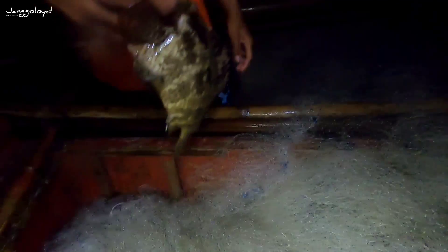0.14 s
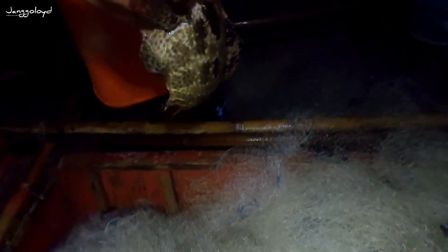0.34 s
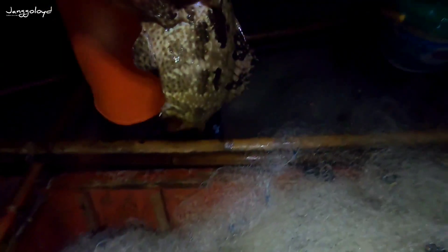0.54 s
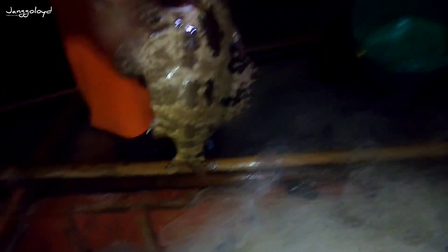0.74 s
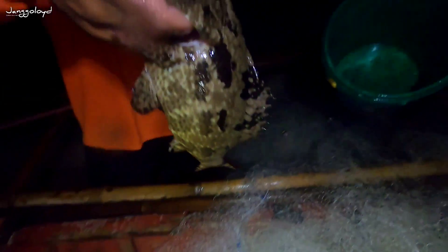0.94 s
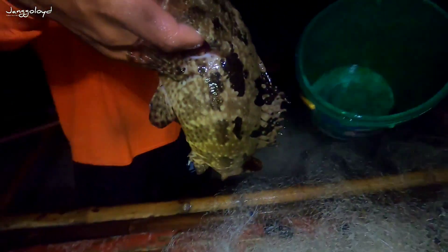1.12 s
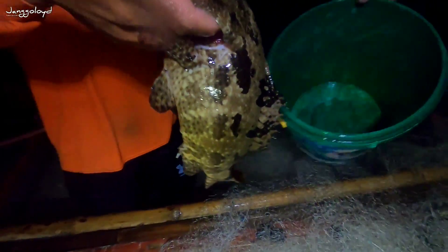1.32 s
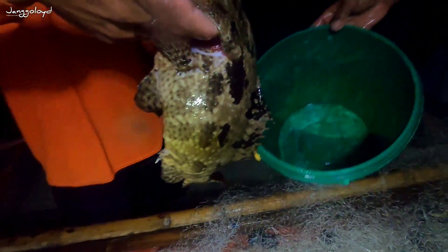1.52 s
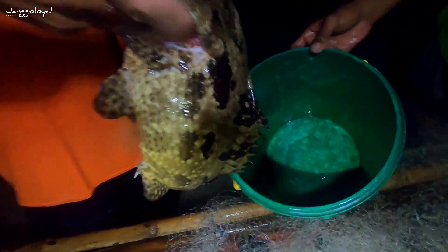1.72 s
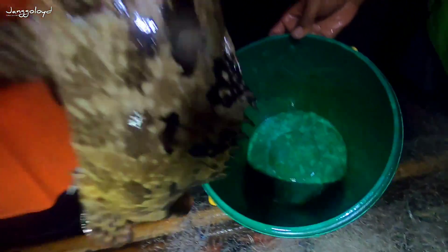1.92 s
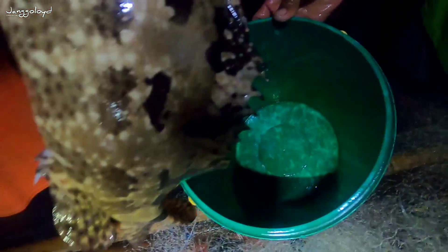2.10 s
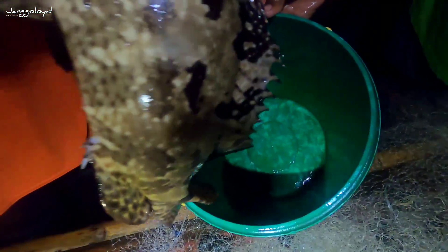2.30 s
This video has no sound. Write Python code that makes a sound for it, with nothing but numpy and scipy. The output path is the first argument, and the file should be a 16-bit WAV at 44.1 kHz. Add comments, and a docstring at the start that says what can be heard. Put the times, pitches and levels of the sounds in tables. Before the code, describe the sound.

Very close, dry knocks and bassy jolts crowd together, loudest just before one second, over gritty rubbing; they stop abruptly, leaving quiet open air, faint water blips, low rumble and one dull plastic bump.

```python
"""Rubbing and a low rumble are heard first; knocks, jolts, clinks and a squeak fill the first second.
They come from a hand-held case with two microphones, shifted in the grip on a small boat.
Then a low rumble and faint hiss remain, with faint water laps and a soft hollow bump from a bucket.
Struck bodies are sums of decaying modes; rubbing is random clicks; rumble and hiss are filtered noise."""
import sys
import numpy as np
from scipy import signal
from scipy.fft import rfft, irfft
from scipy.io import wavfile
from scipy.ndimage import uniform_filter1d

SR = 44100
rng = np.random.default_rng(int(sys.argv[2]) if len(sys.argv) > 2 else 0)


def master_out(mix):
    """Clip the mix to full scale and print it as 16-bit PCM to the path in sys.argv[1]."""
    frames = np.transpose(np.atleast_2d(mix))
    ceiling = np.clip(frames, -1, 1)
    pcm = np.round(ceiling * 32767).astype(np.int16)
    wavfile.write(sys.argv[1], SR, pcm)


N = 103635

# rubbing level over time: time_s, level_db (before flicker)
RUB_LEVEL = [(0, -52.5), (.176, -59), (.186, -38), (.21, -39.5), (.265, -47.5), (.295, -49), (.316, -37.5),
             (.335, -45.5), (.368, -37.5), (.412, -55), (.427, -39.5), (.45, -55.5), (.535, -43),
             (.572, -48), (.6, -40), (.655, -41), (.69, -60), (.745, -50.5), (.82, -59.5), (.85, -35),
             (.895, -39.5), (.918, -57.5), (.98, -90.5)]
# spectrum of the rubbing: frequency_hz, relative_db
RUB_SPECTRUM = [(150, 5.5), (300, -9), (580, -0.5), (800, -0.5), (1200, 6.5), (1900, 3), (2400, -3.5),
                (3000, 1), (3700, -11), (4500, -9), (5600, -17), (8000, -36.5), (11000, -51),
                (16000, -51.5)]
RUB_GRAINS_PER_S, GRAIN_SPREAD_DB = 2400, 4
RUB_FLICKER_DB, RUB_FLICKER_PER_S = 2, 150  # how fast the grip catches and lets go
RUB_FLUTTER_DB, RUB_FLUTTER_PER_S = 3.5, 90
# fine crackles as the wet grip slides: middle_s, half_width_s, level_db, left_minus_right_db
CRACKLE_SWELLS = [(0.615, 0.02, -43.5, 10), (0.853, 0.0041, -45.5, 4), (.881, .012, -40, 4)]
# spectrum of the crackles: frequency_hz, relative_db
CRACKLE_SPECTRUM = [(1000, -14.5), (3200, 15), (4800, 0.5), (6500, -11), (9500, -7.5), (12000, -19),
                    (16000, -34.5)]
CRACKLE_PER_S = 1800

# low rumble over time: time_s, level_db
RUMBLE_LEVEL = [(0, -36.5), (.2, -39.5), (.45, -33.5), (.65, -24), (.85, -25.5), (.97, -46), (1.1, -47),
                (1.28, -51.5), (1.45, -49), (1.75, -45), (1.97, -44), (2.09, -39), (2.2, -39.5),
                (2.35, -40)]
# spectrum of the rumble: frequency_hz, relative_db
RUMBLE_SPECTRUM = [(3, -35), (12, -7.5), (25, 2), (38, 3), (60, -13.5), (85, -18), (120, -15.5), (170, -28),
                   (250, -43), (400, -58.5), (900, -88)]
RUMBLE_SIDE_DB = -35  # level of the unshared part
# faint hiss over time: time_s, level_db (before the overall hiss level)
HISS_LEVEL = [(0.95, -63), (1.31, -75), (1.5, -63.5), (1.8, -63), (1.95, -62), (2.298, -62), (2.33, -63.5)]
# spectrum of the hiss: frequency_hz, relative_db
HISS_SPECTRUM = [(200, -12), (400, -10), (600, -8.5), (800, -17), (1000, -1), (1190, 7.5), (1500, -6.5),
                 (2000, -10), (2600, -11), (3050, -8.5), (3700, -17.5), (5000, -21.5), (7000, -34.5),
                 (10000, -49.5), (16000, -38)]
HISS_SIDE_DB, HISS_DB, HISS_FLICKER_DB = -29.5, -2, 1.5  # stereo width, overall level, waver
HISS_FLUTTER_DB, HISS_FLUTTER_PER_S = 1.7, 22
FLUTTER_LOW_HZ = 350

# knocks on the case: start_s, six levels_db (one per band below), left_minus_right_db (at PAN_FULL_HZ),
# ring_length_factor, pitch_factor (from the grip)
KNOCK_EVENTS = [(.186, -68, -66, -37, -53, -47, -90, -5, 3.5, 1.01),
                (0.2322, -42, -38, -26, -20, -39.5, -61, 0, 1.2, .88),
                (0.3023, -40.5, -29.5, -36, -44.5, -72, -86, -6, 0.74, 0.97),
                (0.3137, -72, -39, -40, -66, -78, -88, -15, 4, 0.74),
                (.341, -67, -40, -42, -43, -55, -79, 6, 1.9, 0.93),
                (0.3598, -53, -69, -30.5, -37, -32, -60, -0.5, 1.07, 1.097),
                (0.419, -69, -48, -51, -62, -55, -74, -3, 3.34, 0.97),
                (0.5112, -78.5, -42, -46, -42.5, -47, -78, 0, 1.4, 0.97),
                (0.5338, -60, -61, -38.5, -39.5, -43.5, -76, 2, 1.8, 0.78),
                (0.5877, -34.5, -42, -32.5, -36.5, -51.5, -69, 1, 1.3, 1.01),
                (.5902, -50, -40, -27.5, -31.5, -44.5, -62, 3, 1.2, 0.97),
                (.618, -53.5, -56.5, -52, -29.5, -39, -52, 2.5, 0.48, 1.07),
                (0.661, -40.5, -41, -52, -46, -50, -67.5, -0.5, 1.6, 0.97),
                (0.672, -24, -21.5, -31, -12, -24.5, -42.5, 7.5, 0.58, 1.038),
                (0.7164, -70, -71, -63, -54.5, -54, -77, 3.5, 0.73, 1.04),
                (0.7506, -15.5, -27, -16.5, -25, -26, -47, -2, .6, 1.096),
                (.793, -39, -57, -49, -61, -50.5, -71, 1, 1.7, 0.97),
                (0.8573, -13, -15.5, -32, -25.5, -34, -76.5, -1.5, 0.71, 1.04),
                (0.8693, -30.5, -39.5, -29.5, -23, -33.5, -47, 4.5, 0.95, 0.996),
                (0.8887, -51, -33.5, -26.5, -27, -47.5, -66.5, 7.5, 1.1, .92),
                (.9012, -45.5, -29, -33.5, -44, -55, -81, -2, 1.2, 1.24)]
# centres of the knock bands: frequency_hz
KNOCK_CENTRES_HZ = [330, 620, 1600, 3000, 4600, 8000]
# modes of the case, before each knock's pitch factor: pitch_hz
CASE_PITCHES_HZ = [275, 410, 580, 740, 1170, 1300, 1600, 1890, 2120, 2900, 3220, 3700, 4500, 6400, 8700]
# strength and ring of those modes, before each knock's length factor: relative_db, t60_s
CASE_MODES = [(-1.5, .02), (2.5, 0.016), (1.5, .03), (-5.5, 0.0069), (-2.5, 0.029), (-3, 0.019),
              (-6.5, 0.027), (-2, 0.012), (-8, 0.013), (-5.5, 0.017), (0, 0.0034), (-5, 0.004),
              (-7.5, 0.0056), (-8.5, 0.0066), (-8, 0.0069)]
CASE_DETUNE = .012  # random spread of mode pitch, as a fraction
CONTACT_CYCLES = 0.54  # a mode swells over this part of its nominal period
PORT_TURN_RAD, PORT_SCATTER_RAD = 1.414, 0.28  # the two microphones ride the modes out of step
PAN_FULL_HZ = 3240  # lower modes reach both microphones more evenly
CRACK_DB, CRACK_T60_S, CRACK_TOP_DB = -19, 0.012, -21.5  # t60 before the length factor
# one knock leaves the case ringing hollow
HOLLOW_S, HOLLOW_HZ, HOLLOW_DB, HOLLOW_T60_S = .5885, 578, -5, 0.037

# jolts: start_s, pitch_hz, level_db, t60_s, phase_between_microphones_rad
JOLTS = [(0.2358, 36.2, -6, 0.15, 0.17), (0.237, 104, -17.5, 0.1, 0.11), (0.303, 72.5, -11, 0.036, 0.45),
         (0.435, 54, -30.5, 0.27, 0.41), (0.511, 30.8, -24, 0.82, 0.23), (0.588, 113, -8, 0.042, 0.15),
         (0.594, 32.4, -5.5, 0.18, 0.38), (0.673, 112.2, -2.5, .035, 2.7),
         (0.752, 60.7, -13.5, 0.037, 0.59), (0.753, 165, -14, 0.034, 0.5), (0.821, 25.4, -11.5, 0.15, 0.13),
         (0.8587, 128.5, -0.5, 0.027, 0.81), (0.868, 179.6, -8, 0.061, 0.26),
         (0.873, 44.75, -6.5, 0.15, 0.19), (0.9, 110.4, -13, .11, 0.054)]
THUMP_ATTACK_S = 0.0024

# clinks of a small hard part: start_s, level_db
CLINK_EVENTS = [(.552, -20.5), (.8885, -29)]
# modes of that part: pitch_hz, relative_db, t60_s
CLINK_MODES = [(1720, -7, .042), (2112, 0, .046), (2590, -10, .045), (4635, -3, .011)]

# the grip squeaks until a knock lands at 0.672 s
SQUEAK_S, SQUEAK_LENGTH_S = .645, .027
SQUEAK_HZ, SQUEAK_WAVER = 2790, .006  # waver as a fraction of the pitch
SQUEAK_DB, SQUEAK_PAN_DB = -30.5, -13.5

# water laps and drips beside the boat: start_s, pitch_hz (centre), level_db (first bubble)
LAP_EVENTS = [(1.015, 970, -50.5), (1.059, 1195, -52.5), (1.39, 1070, -51.5), (1.432, 545, -59.5),
              (1.508, 1181, -46), (1.525, 630, -59), (1.554, 1194, -48.5), (1.622, 1196, -50),
              (1.726, 2943, -59), (1.775, 659, -53), (1.778, 3053, -58.5), (1.89, 988, -46.5),
              (2.135, 2450, -56.5), (2.274, 1120, -55)]
LAP_SPREAD = .03  # random spread of bubble pitch, in natural-log units
LAP_T60_S, LAP_SCATTER_S = 0.033, .016

# modes of the bucket: pitch_hz, relative_db, t60_s
BUCKET_MODES = [(68, 8.5, 0.123), (127.3, 10.5, 0.067), (183.4, 7, 0.13), (256.5, 11.5, 0.072),
                (325, 2, 0.03), (554, -6, 0.031), (941, -11.5, 0.076), (1177, 3, 0.039), (2400, -16, 0.055),
                (3030, -17, 0.051)]
# blows of its bump: start_s, level_db
BUCKET_BLOWS = [(1.82, -37.5), (1.849, -47.5), (1.891, -57)]

TOP_HZ = 16200
CEILING = 1.05  # full scale is 1


def undb(db):
    """Logarithmic level: 20 dB is a tenfold amplitude."""
    return 10 ** (np.asarray(db) / 20)


def curve(rows):
    """Envelope: level is interpolated in dB between (time_s, level_db) points, giving a gain."""
    return undb(np.interp(np.arange(N) / SR, *np.array(rows).T))


def pan(db):
    """Intensity stereo: half the level difference goes to each side with opposite sign."""
    return undb(np.array([[db], [-db]]) / 2)


def colour(x, rows):
    """Linear filtering: the spectrum is weighted by (frequency_hz, db) points, then scaled to rms 1."""
    hz, db = np.array(rows).T
    f = np.fft.rfftfreq(x.shape[-1], 1 / SR)
    gain = undb(np.interp(np.log(f + 1), np.log(hz), db))
    y = irfft(rfft(x) * gain, x.shape[-1])
    return y / np.sqrt(np.mean(y ** 2))


def walk(rate):
    """Slow random fluctuation: noise averaged twice over 1/rate seconds, with standard deviation 1."""
    k = int(SR / rate)
    y = uniform_filter1d(uniform_filter1d(rng.standard_normal(N), k), k)
    return y / y.std()


def add(out, start, sound):
    """Superposition: a sound is summed in at its start time."""
    i = int(start * SR)
    out[:, i:i + sound.shape[1]] += sound[:, :N - i]


def fade(t, t60):
    """Exponential damping: amplitude falls by 60 dB in t60 seconds."""
    return np.exp(-np.log(1000) * t / t60)


def ring(hz, t60, attack, turn):
    """Damped resonance: one mode swells and decays, turn radians apart at the two microphones."""
    t = np.arange(SR // 3) / SR
    phase = np.array([[turn], [-turn]]) / 2
    swell = (1 - np.exp(-(t / attack) ** 2)) ** 2
    return np.sin(2 * np.pi * hz * t + phase) * fade(t, t60) * swell


def stereo_noise(rows, side_db):
    """Partial coherence: a shared noise plus a second one in opposite sign on the two sides."""
    mid, side = colour(rng.standard_normal((2, N)), rows)
    return mid + undb(side_db) * side * np.array([[1], [-1]])


def flutter(x, db, per_s, count=14):
    """Band-wise modulation: third-octave slots waver independently, each gain having mean power 1."""
    f = np.fft.rfftfreq(N, 1 / SR)
    # the end slots take all that lies below and above
    place = np.clip(np.log2(f / FLUTTER_LOW_HZ + 1e-9) * 3, 0, count - 1)
    spectrum, out = rfft(x), 0
    for k in range(count):
        gain = undb(db * walk(per_s))
        slot = irfft(spectrum * np.maximum(1 - abs(place - k), 0), N)
        out = out + slot * gain / np.sqrt(np.mean(gain ** 2))
    return out


def slips(per_s):
    """Stick-slip friction: random clicks of uneven size and either sign, independent on each side."""
    sizes = undb(GRAIN_SPREAD_DB * np.minimum(rng.exponential(size=(2, N)), 3))
    signs = rng.choice([-1, 1], (2, N))
    return sizes * signs * (rng.random((2, N)) < per_s / SR)


def rubbing():
    """Dry friction: skin sticks and slips on the case in dense clicks, with brighter crackles."""
    flicker = undb(RUB_FLICKER_DB * walk(RUB_FLICKER_PER_S))
    rub = colour(slips(RUB_GRAINS_PER_S), RUB_SPECTRUM) * curve(RUB_LEVEL) * flicker
    t = np.arange(N) / SR
    swells = 0
    for middle, width, db, pan_db in CRACKLE_SWELLS:
        swells = swells + np.exp(-((t - middle) / width) ** 2) * undb(db) * pan(pan_db)
    crackle = colour(slips(CRACKLE_PER_S), CRACKLE_SPECTRUM) * swells
    return flutter(rub, RUB_FLUTTER_DB, RUB_FLUTTER_PER_S) + crackle


def background():
    """Broadband noise: filtering and slow envelopes shape a low rumble and a faint wavering hiss."""
    rumble = stereo_noise(RUMBLE_SPECTRUM, RUMBLE_SIDE_DB) * curve(RUMBLE_LEVEL)
    waver = undb(HISS_DB + HISS_FLICKER_DB * walk(23))
    hiss = stereo_noise(HISS_SPECTRUM, HISS_SIDE_DB) * curve(HISS_LEVEL) * waver
    return rumble + flutter(hiss, HISS_FLUTTER_DB, HISS_FLUTTER_PER_S)


def case_ring(band_db, pan_db, length, pitch):
    """Modal excitation: a knock drives every mode of the case, weighted by its band levels."""
    hit = 0
    chances = rng.standard_normal((len(CASE_MODES), 2))
    for k, (hz, (db, t60), (detune, turn)) in enumerate(zip(CASE_PITCHES_HZ, CASE_MODES, chances)):
        mode_db = db + np.interp(np.log(hz), np.log(KNOCK_CENTRES_HZ), band_db)
        decay = t60 * length
        # longer rings start weaker, which offsets their longer decay; signs alternate
        size = (-1) ** k * undb(mode_db) * np.sqrt(0.18 / decay) * pan(pan_db * hz / PAN_FULL_HZ)
        apart = PORT_TURN_RAD * min(hz / 900, 1) + PORT_SCATTER_RAD * turn
        mode_hz = hz * pitch * (1 + CASE_DETUNE * detune)
        hit = hit + size * ring(mode_hz, decay, CONTACT_CYCLES / hz, apart)
    return hit


def contact_crack(band_db, pan_db, length):
    """Impact noise: a short decaying burst carries the knock's own spectrum, after 1/20 s of lead-in."""
    t = np.arange(SR // 8) / SR
    per_hz = np.array(band_db) - 10 * np.log10(KNOCK_CENTRES_HZ)  # band level to density
    shape = [*zip(KNOCK_CENTRES_HZ, per_hz), (TOP_HZ, per_hz[-1] + CRACK_TOP_DB)]
    burst = rng.standard_normal((2, len(t))) * fade(t, CRACK_T60_S * length)
    crack = colour(np.pad(burst, ((0, 0), (SR // 20, 0))), shape)
    return undb(CRACK_DB) * np.linalg.norm(undb(band_db)) * crack * pan(pan_db)


def knocks():
    """Impact on a shell: each knock sums ringing modes and a crack; one adds a hollow resonance."""
    out = np.zeros((2, N))
    for start, *band_db, pan_db, length, pitch in KNOCK_EVENTS:
        add(out, start, case_ring(band_db, pan_db, length, pitch))
        add(out, start - 1 / 20, contact_crack(band_db, pan_db, length))
    hollow = ring(HOLLOW_HZ, HOLLOW_T60_S, attack=0.0042, turn=0.55)
    add(out, HOLLOW_S, undb(HOLLOW_DB) * hollow)
    return out


def thumps():
    """Damped low-frequency motion: each jolt sways the microphones in a decaying oscillation."""
    out = np.zeros((2, N))
    for start, hz, db, t60, turn in JOLTS:
        add(out, start, undb(db) * ring(hz, t60, THUMP_ATTACK_S, turn))
    return out


def clink():
    """Modal ringing: a small hard part sounds a few high, quickly damped modes."""
    out = np.zeros((2, N))
    tone = sum(undb(db) * ring(hz, t60, attack=0.00037, turn=1.55) for hz, db, t60 in CLINK_MODES)
    for start, db in CLINK_EVENTS:
        add(out, start, undb(db) * tone)
    return out


def squeak():
    """Periodic stick-slip: a trembling tone swells, then stops over its last 5.4 ms."""
    t = np.arange(int(SQUEAK_LENGTH_S * SR)) / SR
    hz = SQUEAK_HZ * (1 + SQUEAK_WAVER * walk(600)[:len(t)])
    rise = (t / SQUEAK_LENGTH_S) ** 1.5
    stop = np.clip((SQUEAK_LENGTH_S - t) / 0.0054, 0, 1)
    tremble = undb(2 * walk(700)[:len(t)])
    tone = np.sin(2 * np.pi * np.cumsum(hz) / SR)
    out = np.zeros((2, N))
    add(out, SQUEAK_S, undb(SQUEAK_DB) * rise * stop * tremble * tone * pan(SQUEAK_PAN_DB))
    return out


def laps(count=4):
    """Bubble resonance: each lap is a cluster of detuned damped tones, successively weaker."""
    out = np.zeros((2, N))
    for start, hz, db in LAP_EVENTS:
        for k, detune in enumerate(rng.standard_normal(count)):
            bubble = ring(hz * np.exp(LAP_SPREAD * detune), LAP_T60_S, attack=0.002, turn=0.071)
            add(out, start + k / count * LAP_SCATTER_S, undb(db) / np.sqrt(k + 1) * bubble)
    return out


def bucket():
    """Impact on a plastic shell: ever weaker blows excite its modes, with a decaying noise scuff."""
    out = np.zeros((2, N))
    body = sum(undb(db) * ring(hz, t60, attack=0.0033, turn=0.041) for hz, db, t60 in BUCKET_MODES)
    t = np.arange(body.shape[1]) / SR
    for start, db in BUCKET_BLOWS:
        noise = stereo_noise(HISS_SPECTRUM, side_db=-24.5)[:, :len(t)]
        scuff = noise * fade(t, t60=0.051) * undb(-25)
        add(out, start, undb(db) * (body + scuff))
    return out


def scene():
    """Superposition in the open air: all sources add, close and without reverberation."""
    handling = rubbing() + knocks() + thumps() + clink() + squeak()
    return handling + background() + laps() + bucket()


def record(dry):
    """Saturation and band limiting: the sharpest peaks are rounded and the top is cut off."""
    held = dry / (1 + (dry / CEILING) ** 6) ** (1 / 6)
    lowpass = signal.ellip(8, .2, 70, TOP_HZ, fs=SR, output="sos")
    return signal.sosfilt(lowpass, held)


dry = scene()
out = record(dry)
master_out(out)
```